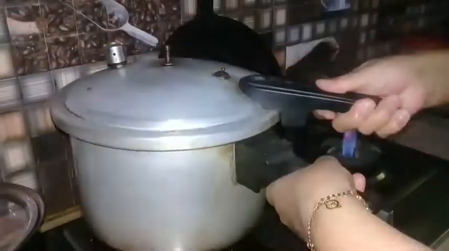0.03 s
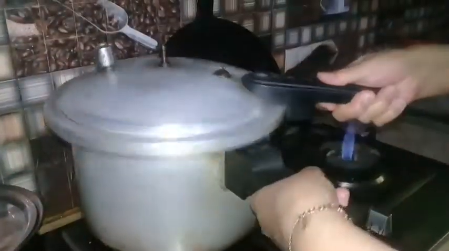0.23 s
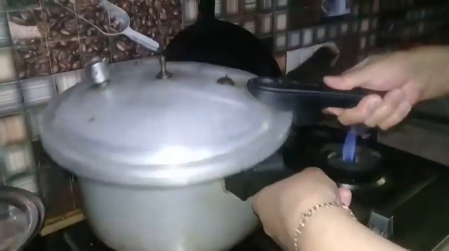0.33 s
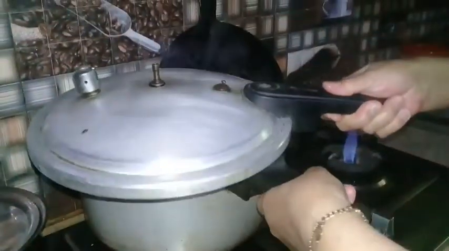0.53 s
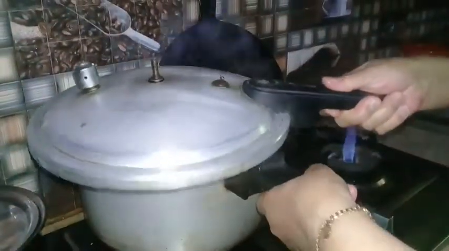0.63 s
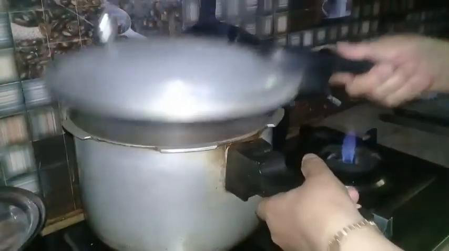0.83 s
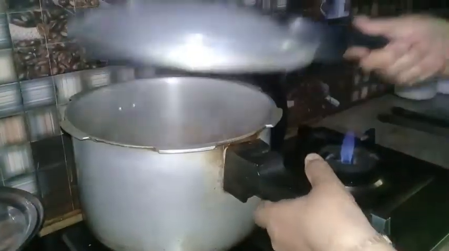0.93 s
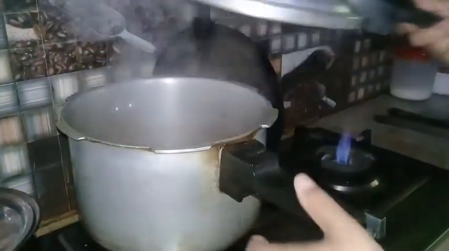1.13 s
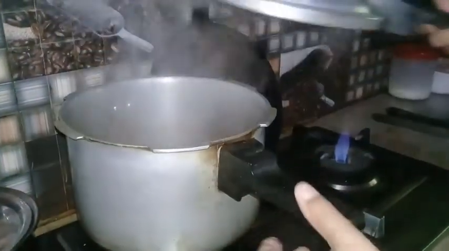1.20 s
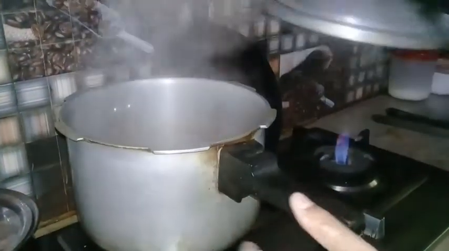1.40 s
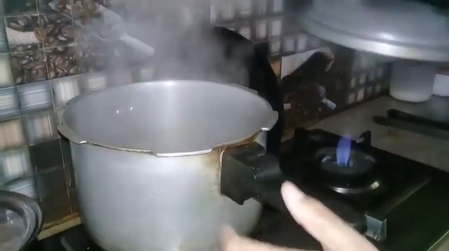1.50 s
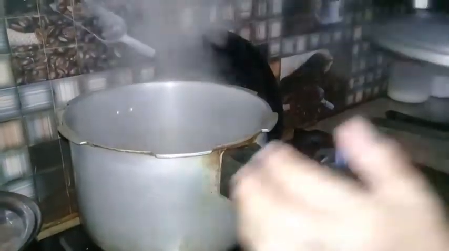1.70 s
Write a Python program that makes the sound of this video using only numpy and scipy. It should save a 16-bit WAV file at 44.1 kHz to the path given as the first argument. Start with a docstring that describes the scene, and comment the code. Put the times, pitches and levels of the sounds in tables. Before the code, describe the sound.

A pressure cooker vents in a small tiled kitchen. Steam hisses softly past the seal, then at 0.2 seconds one loud whoosh bursts out, ringing the pot as the lid thumps and clanks free, dying away by about 0.5 seconds. A quiet gas burner remains, with soft handle bumps and faint spits between 0.7 and 1.6 seconds. From 1.4 seconds the open pot seethes and bubbles faintly.

```python
"""A pressure cooker vents: one short, loud steam whoosh rings the pot as the lid jumps free with a thump.
Before it, steam hisses past the seal. After it, the gas burner is heard, with soft handle bumps and
faint spits, and the open pot seethes up. Steam and flame are shaped noise, the pot is a resonator bank,
blows and bubbles are damped tones. Whoosh and blows reverberate in a small tiled kitchen."""
import sys
import numpy as np
from scipy import signal
from scipy.fft import rfft, irfft
from scipy.io import wavfile
from scipy.ndimage import uniform_filter1d, minimum_filter1d

SR = 44100
rng = np.random.default_rng(int(sys.argv[2]) if len(sys.argv) > 2 else 0)


def unload_audio(sound):
    """Save the sound as a 16-bit wav file, at the path given as the first command line argument."""
    columns = np.transpose(np.atleast_2d(sound))
    # keep every value between -1 and 1, then stretch to whole-number steps
    steps = np.round(np.clip(columns, -1, 1) * 32767)
    wavfile.write(sys.argv[1], SR, steps.astype(np.int16))


N = 77175
T = np.arange(N) / SR

# Kitchen reverberation: f/Hz, T60/s
KITCHEN_T60 = [(100, 0.59), (300, 0.59), (1000, 0.44), (2500, 0.45), (5000, 0.41), (12000, 0.41)]
# Flame spectrum: f/Hz, relative density/dB
BURNER_SPECTRUM = [(25, -42), (60, -15), (88, 2.5), (120, -1), (150, -14.5), (198, 4), (250, -2.5),
                   (390, -2.5), (600, -8), (900, -9), (1700, -11.5), (2900, -13.5), (4000, -23.5),
                   (6200, -33), (8500, -40.5), (15500, -41)]
# Flame envelope: t/s, level/dB
BURNER_LEVEL = [(0, -43.5), (.7, -47), (1.0, -47), (1.3, -48), (1.75, -46.5)]
# Seething spectrum: f/Hz, relative density/dB
SEETHE_SPECTRUM = [(25, -40), (50, -16), (115, -3), (155, -9.5), (205, -2), (280, -5), (600, -9.5),
                   (820, -6), (1160, -12), (2400, -11.5), (4000, -23.5), (6500, -38), (10000, -42),
                   (15500, -40)]
# Seething envelope: t/s, level/dB
SEETHE_LEVEL = [(1.33, -67), (1.41, -50.5), (1.47, -46.5), (1.6, -46.5), (1.75, -44.5)]
# Handle bumps: t/s, level/dB, f/Hz, decay/s
HANDLE_BUMPS = [(.724, -42, 202, .022), (.733, -41, 717.5, 0.022), (0.861, -39.5, 332, 0.0086),
                (0.929, -42.5, 108, 0.011), (.93, -40, 381, 0.013), (.98, -44, 200, 0.027),
                (1.039, -41, 285, 0.011), (1.451, -40, 205, 0.054), (1.62, -49, 277, .012)]
# Spits and squeaks: t/s, level/dB, f/Hz, width sigma/Hz, length sigma/s
RIM_SPITS = [(.238, -37, 15200, 600, .003), (.238, -38, 12500, 550, .003), (.888, -67, 7100, 250, .016),
             (1.005, -55, 1885, 90, .025), (1.115, -53, 1790, 60, .011), (1.586, -62, 9800, 2200, .02),
             (1.58, -61, 4200, 1200, .035)]
# Seal hiss spectrum: f/Hz, relative density/dB
LEAK_SPECTRUM = [(25, -36), (60, -15.5), (100, -4.5), (128, 7.5), (165, -20), (270, -8.5), (420, -17.5),
                 (700, -16), (1000, -20.5), (2500, -18.5), (3150, -15), (4460, -20), (6000, -15.5),
                 (8500, -34), (12000, -30.5), (15500, -37)]
# Lid thrown by pressure: t/s, level/dB, f/Hz, decay/s
LID_JOLTS = [(.225, -9.5, 134.7, 0.016), (.254, -8.5, 211.9, 0.016), (0.326, -21, 129.2, 0.025),
             (.33, -13, 388.1, 0.015)]
# Lid against rim: t/s, level/dB, f/Hz, decay/s
LID_CLANKS = [(.230, -9.5, 677, 0.0053), (.2495, -10.5, 644, 0.015), (.278, -15, 893.8, 0.037),
              (.347, -17.5, 2067, 0.021)]
# Modes of pot, lid and enclosed air: f/Hz, width/Hz, gain/dB
POT_MODES = [(200.5, 21, -17), (393.7, 15, -10.5), (640, 21, -11), (697, 12, -26), (889, 32, -13),
             (969, 15, -16), (1300, 23, -44), (1391, 18, -14), (1800, 13, -24), (2070, 15, -23),
             (2395, 18, -60), (2840, 18, -18.5), (3109, 9.2, -17.5), (3921, 9.5, -23.5)]
# Flow through the gap: t/s, relative level/dB
GAP_FLOW = [(.216, -33), (.222, -18.5), (.229, -16.5), (.233, -3), (.239, -13.5), (.246, -30), (.251, -5),
            (.27, -11.5), (.298, -13), (.315, -15.5), (.338, -24), (.353, -18.5), (.368, -24.5),
            (.40, -36.5), (.44, -36), (.47, -54)]
# Jet spectrum before the shelves: f/Hz, relative density/dB
JET_SPECTRUM = [(25, -40), (45, -27), (80, -17), (130, -14), (170, 1.5), (280, -2), (480, -6), (650, -4),
                (1000, -3.5), (1200, -7), (1900, -7.5), (3100, -6.5), (3900, -12.5), (4400, -16.5),
                (6200, -22.5), (8000, -36.5), (10500, -43.5), (13000, -54), (15500, -58)]
# Jet treble shelf: t/s, gain/dB
JET_TREBLE = [(.23, -1.5), (.29, 3), (.36, 8.5)]
# Jet finest-hiss shelf: t/s, gain/dB
JET_TOP = [(.225, -13), (.25, -4.5), (.295, 7), (.33, 2), (.37, -17)]


def amp(db):
    """dB to gain."""
    return 10 ** (np.asarray(db) / 20)


def unit(x):
    """Scale to rms 1."""
    return x / np.sqrt(np.mean(x ** 2) + 1e-20)


def curve(points):
    """(t/s, value) table at every sample."""
    return np.interp(T, *np.transpose(points))


def at_hz(points, hz):
    """(f/Hz, value) table on a log axis."""
    f, value = np.transpose(points)
    return np.interp(np.log(hz + 1), np.log(f + 1), value)


def shaped(gain):
    """White noise weighted by gain(f/Hz), rms 1."""
    return unit(irfft(rfft(rng.standard_normal(N)) * gain(np.fft.rfftfreq(N, 1 / SR)), N))


def noise(spectrum):
    """Noise from a spectrum table, rms 1."""
    return shaped(lambda f: amp(at_hz(spectrum, f)))


def wander(rate_hz):
    """Random drift up to rate_hz, rms 1."""
    return shaped(lambda f: 1 / (1 + (f / rate_hz) ** 4))


def band(hz, sigma_hz):
    """Gaussian noise band, rms 1."""
    return shaped(lambda f: np.exp(-.5 * ((f - hz) / sigma_hz) ** 2))


def shelf(x, points, corner_hz):
    """High shelf following a (t/s, gain/dB) table."""
    low = signal.sosfiltfilt(signal.butter(2, corner_hz, fs=SR, output="sos"), x)
    return low + (x - low) * amp(curve(points))


def resonate(x, hz, width_hz):
    """One resonance; preserves white-noise power."""
    r = np.exp(-np.pi * width_hz / SR)
    zeros = np.sqrt((1 - r * r) / 2) * np.array([1, 0, -1])
    return signal.lfilter(zeros, [1, -2 * r * np.cos(2 * np.pi * hz / SR), r * r], x)


def blow(start_s, db, hz, decay_s, rise_s, rough):
    """Impact: one partly noisy ring that swells and dies."""
    t = np.maximum(T - start_s, 0)
    envelope = (1 - np.exp(-t / rise_s)) ** 2 * np.exp(-t / decay_s)
    ring = np.sin(2 * np.pi * hz * t) + rough * band(hz, hz / 2)
    return amp(db) * envelope / (envelope.max() + 1e-12) * ring


def kitchen(x, delay_s=.006):
    """Tiled-wall reflections, each band decaying at its own rate."""
    hz, t, bands = signal.stft(rng.standard_normal(SR), SR, nperseg=256)
    decay = amp(-60 * t / at_hz(KITCHEN_T60, hz)[:, None])
    tail = signal.istft(bands * decay, SR)[1]
    tail *= np.arange(len(tail)) / SR > delay_s
    return signal.fftconvolve(x, tail / np.linalg.norm(tail))[:N]


def burner(flicker_db=.8):
    """Gas flame: steady roar, slight flicker."""
    return noise(BURNER_SPECTRUM) * amp(curve(BURNER_LEVEL) + flicker_db * wander(rate_hz=25))


def bubbles(rate_per_s=130, low_hz=193, high_hz=1290, pitches=16, decay_cycles=2.2):
    """Bubbles bursting at random, each a short damped tone."""
    t, out = T[:SR // 10], np.zeros(N)
    for hz in np.geomspace(low_hz, high_hz, pitches):
        pops = (rng.random(N) < rate_per_s / pitches / SR) * rng.uniform(.36, 1, N)
        plop = np.sin(2 * np.pi * hz * t) * (1 - np.exp(-hz * t)) * np.exp(-hz * t / decay_cycles)
        out += signal.fftconvolve(pops, plop)[:N]
    return unit(out)


def open_pot(bubble_re_seethe_db=-9.5, flicker_db=.83):
    """The uncovered pot seethes and bubbles up."""
    boil = noise(SEETHE_SPECTRUM) + amp(bubble_re_seethe_db) * bubbles()
    return boil * amp(curve(SEETHE_LEVEL) + flicker_db * wander(rate_hz=110))


def handles():
    """Soft bumps of the handles."""
    return sum(blow(*row, rise_s=.00091, rough=.29) for row in HANDLE_BUMPS)


def spit(at_s, db, hz, sigma_hz, sigma_s):
    """Brief narrow hiss, likely water and steam on the hot rim."""
    return amp(db) * band(hz, sigma_hz) * np.exp(-.5 * ((T - at_s) / sigma_s) ** 2)


def seal_leak(level_db=-37, flicker_db=.35, hold_s=.32, decay_s=.02):
    """Steam hisses past the seal until the pressure is gone."""
    fade = np.exp(-np.maximum(T - hold_s, 0) / decay_s)
    return noise(LEAK_SPECTRUM) * fade * amp(level_db + flicker_db * wander(rate_hz=39))


def lid():
    """Pressure throws the lid; it clatters against the rim."""
    jolts = sum(blow(*row, rise_s=.0061, rough=.29) for row in LID_JOLTS)
    clanks = sum(blow(*row, rise_s=.00077, rough=.55) for row in LID_CLANKS)
    return jolts + clanks


def pot_ring(flow):
    """Flow noise drives the modes of pot, lid and enclosed air."""
    drive = flow * rng.standard_normal(N)
    return sum(amp(db) * resonate(drive, hz, width_hz) for hz, width_hz, db in POT_MODES)


def whoosh(jet_gain_db=-2, flutter_db=1.5):
    """Fluttering steam jet, brighter as the gap opens. Returns jet, pot ring."""
    venting = (T > GAP_FLOW[0][0]) & (T < GAP_FLOW[-1][0])
    flow = amp(curve(GAP_FLOW) + flutter_db * wander(rate_hz=220)) * venting
    jet = shelf(noise(JET_SPECTRUM), JET_TREBLE, corner_hz=1390)
    jet = shelf(jet, JET_TOP, corner_hz=7800)
    return amp(jet_gain_db) * flow * jet, pot_ring(flow)


def scene(jet_send_db=-8.5, pot_send_db=-9.5):
    """Mono mix; jet, ring and blows feed the room."""
    jet, ring = whoosh()
    pot = ring + lid() + handles()
    spits = sum(spit(*row) for row in RIM_SPITS)
    room = kitchen(amp(jet_send_db) * jet + amp(pot_send_db) * pot)
    return (jet + pot + spits + room + seal_leak() + burner() + open_pot())[None]


def record(dry):
    """Low cut, fast peak limiter, band limit."""
    low_cut_hz, high_cut_hz = 40, 15730
    ceiling, window_s = .84, .0049
    x = signal.sosfilt(signal.butter(3, low_cut_hz, "high", fs=SR, output="sos"), dry[0])
    size = int(window_s * SR)
    gain = np.minimum(1, ceiling / (abs(x) + 1e-9))
    gain = uniform_filter1d(minimum_filter1d(gain, size), size)
    lowpass = signal.firwin(511, high_cut_hz, window=("kaiser", 9), fs=SR)
    return signal.oaconvolve(x * gain, lowpass, "same")[None]


dry = scene()
out = record(dry)
unload_audio(out)
```